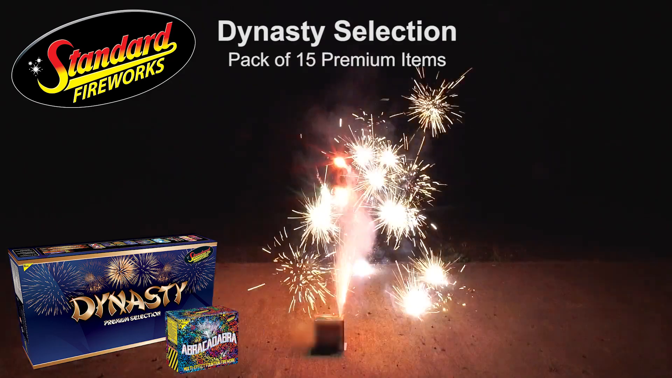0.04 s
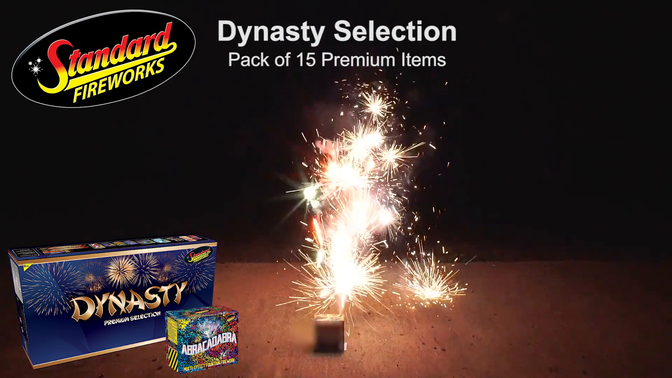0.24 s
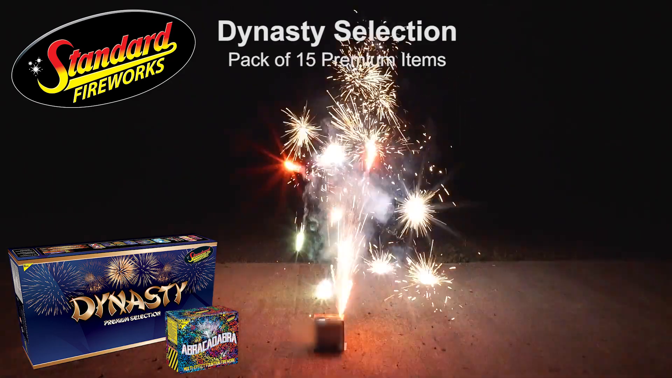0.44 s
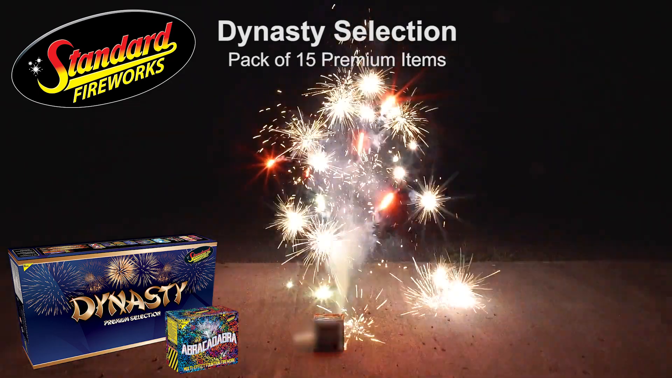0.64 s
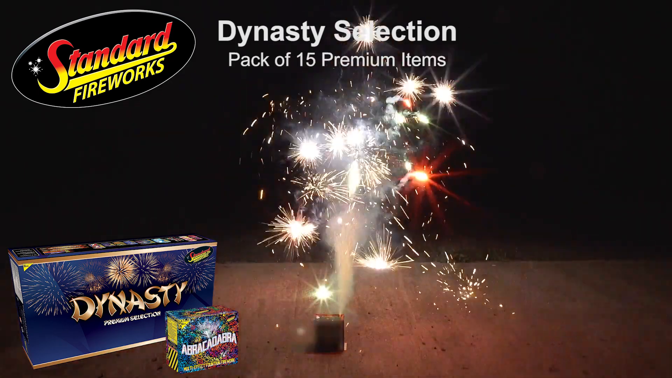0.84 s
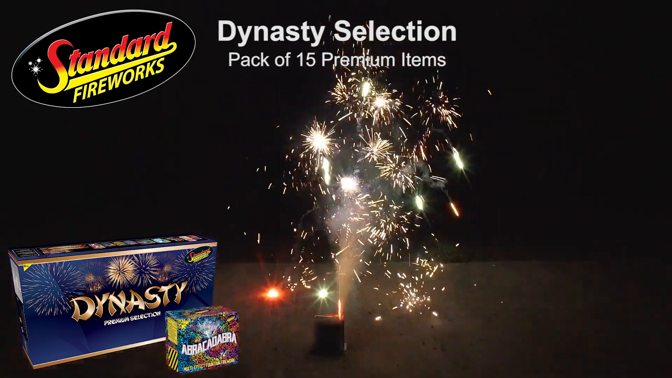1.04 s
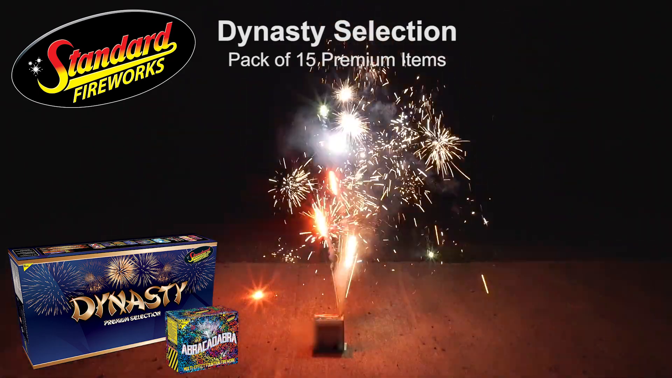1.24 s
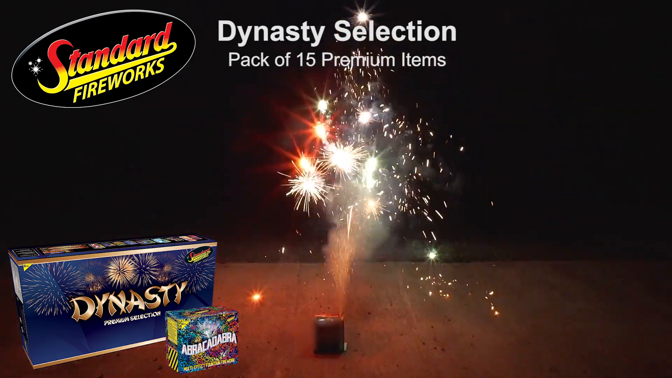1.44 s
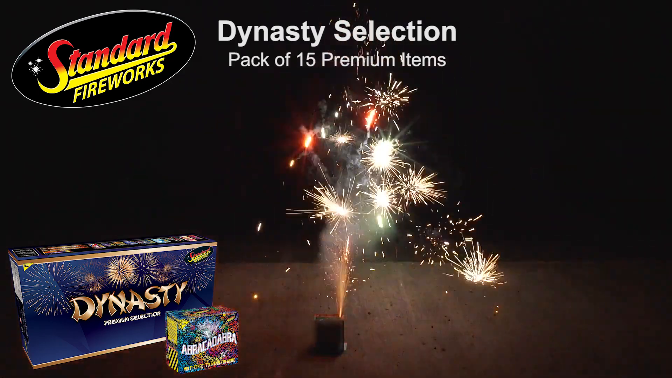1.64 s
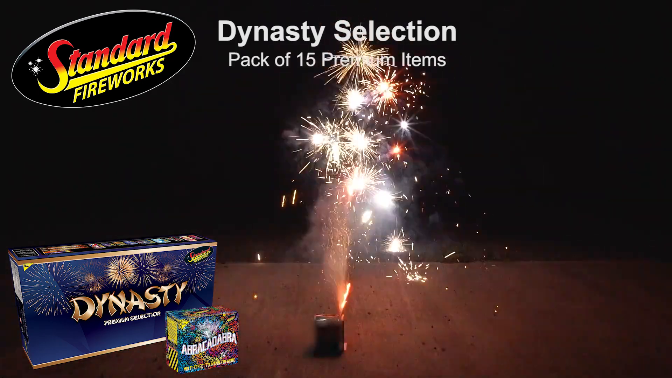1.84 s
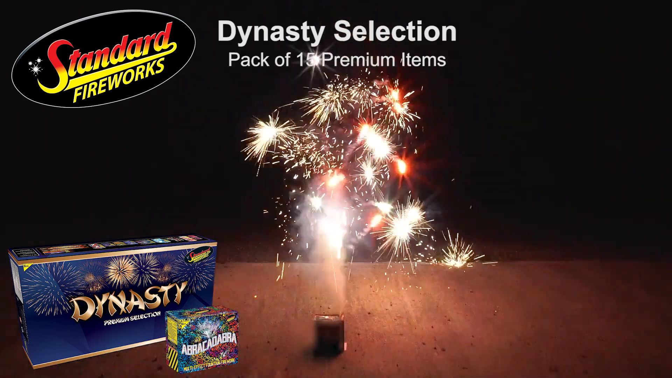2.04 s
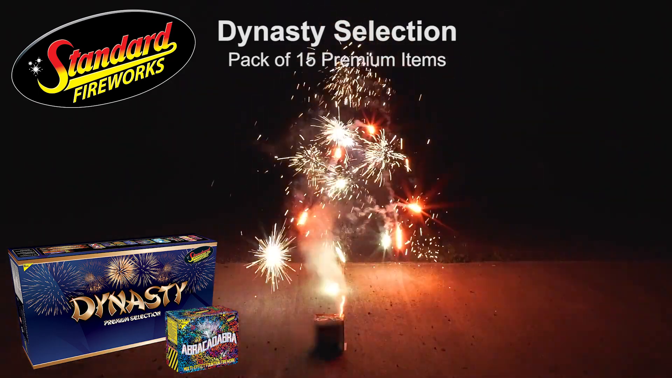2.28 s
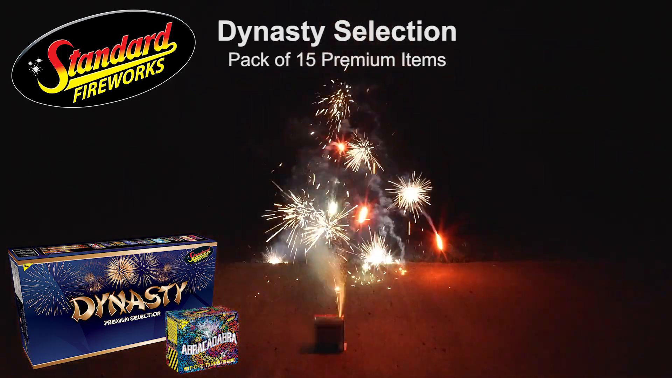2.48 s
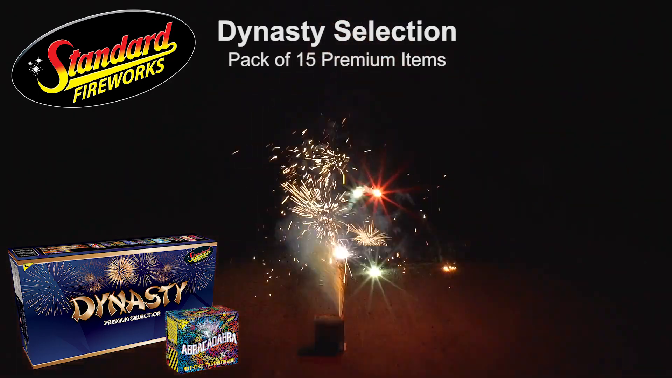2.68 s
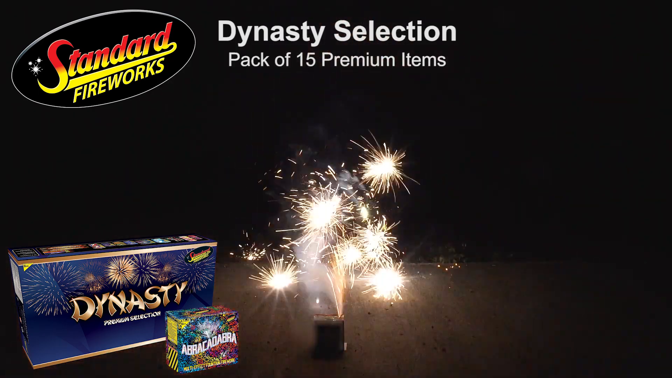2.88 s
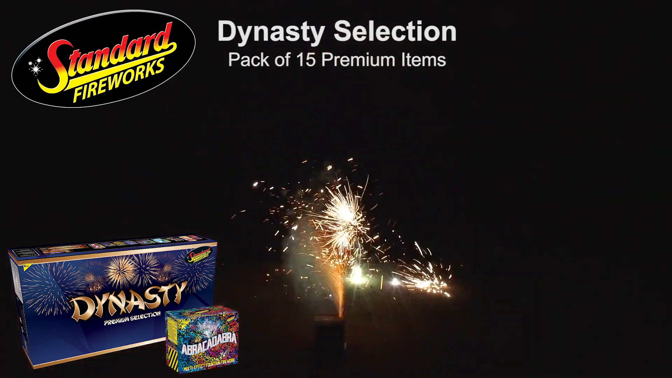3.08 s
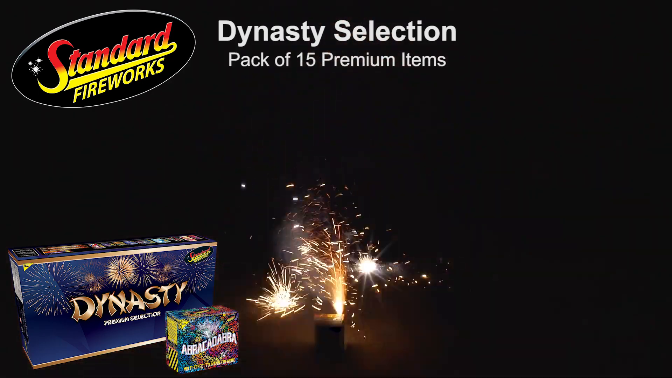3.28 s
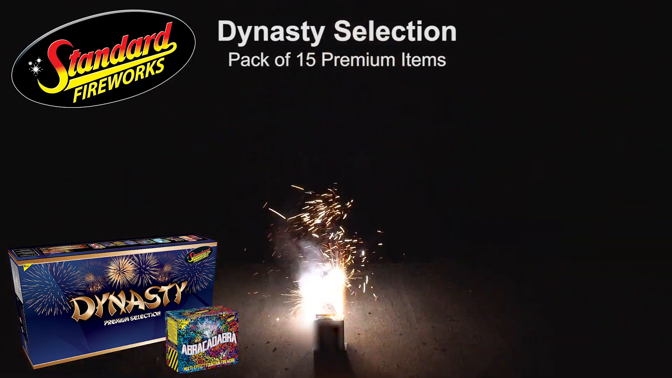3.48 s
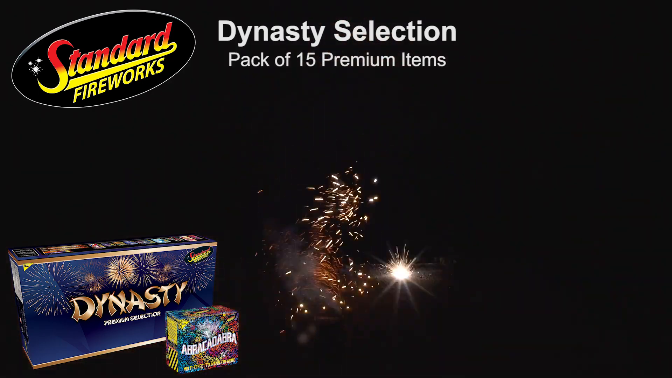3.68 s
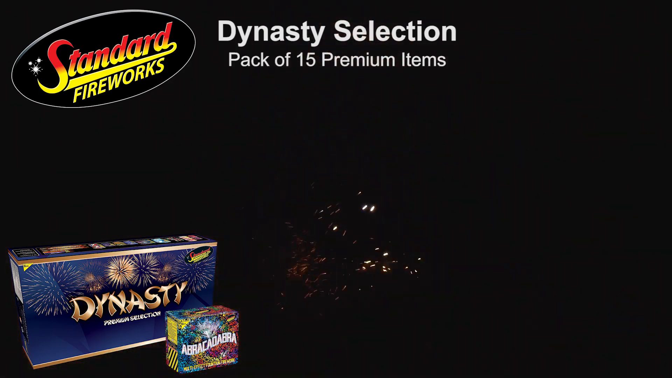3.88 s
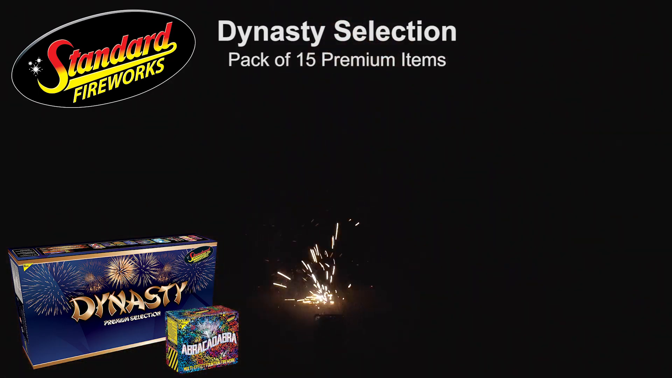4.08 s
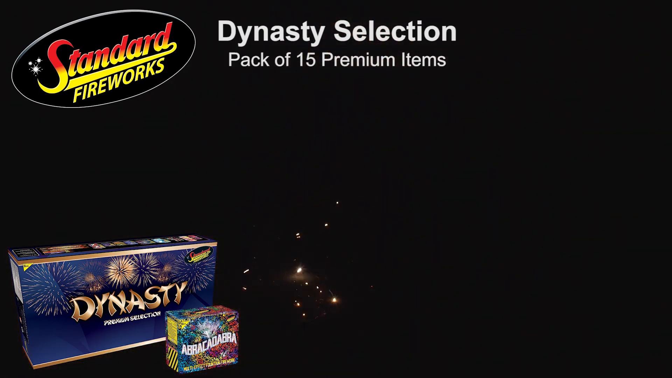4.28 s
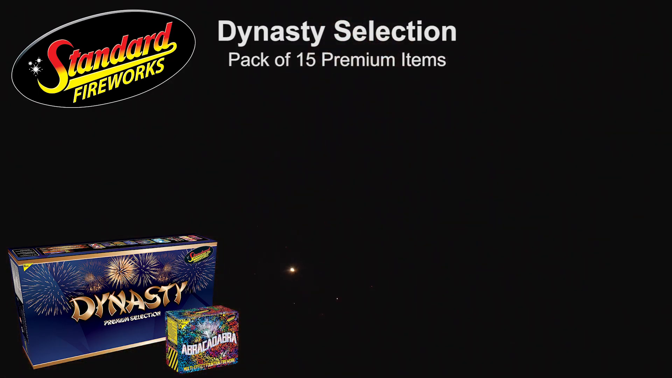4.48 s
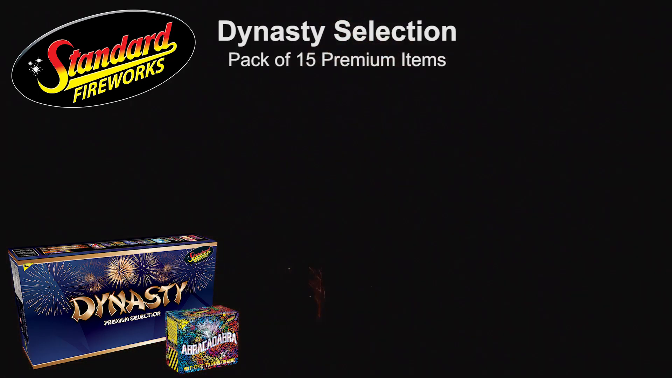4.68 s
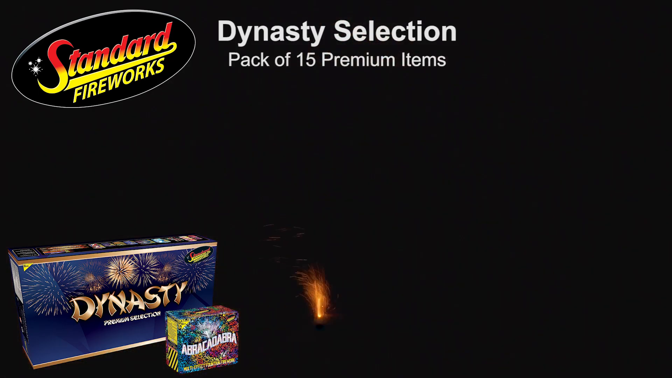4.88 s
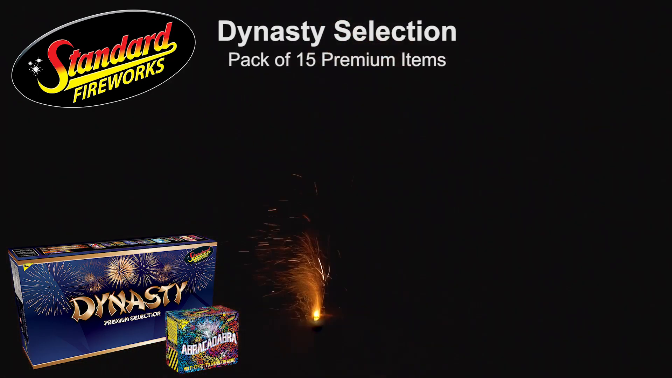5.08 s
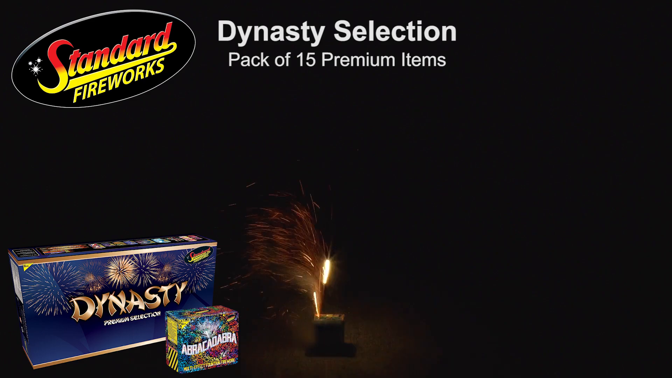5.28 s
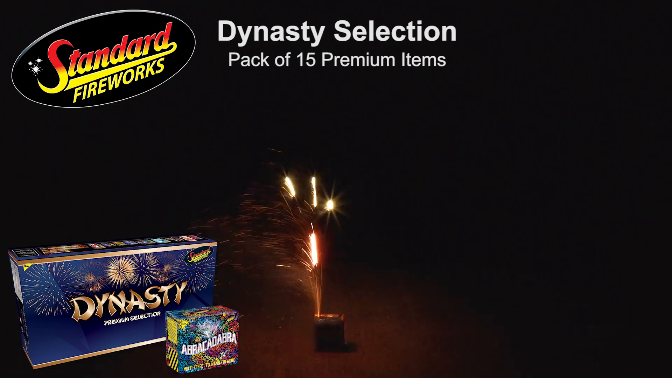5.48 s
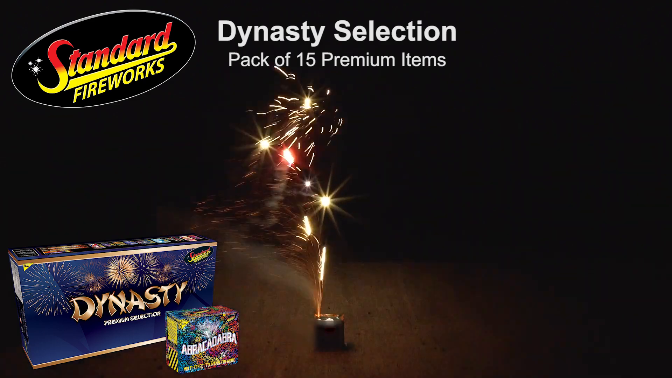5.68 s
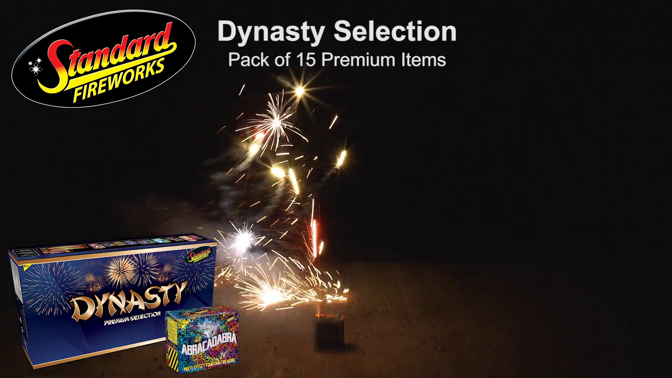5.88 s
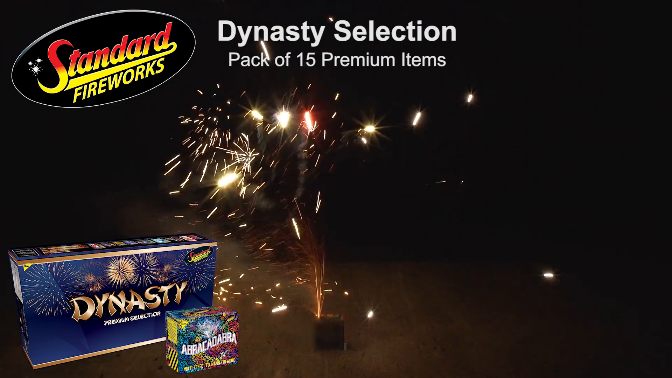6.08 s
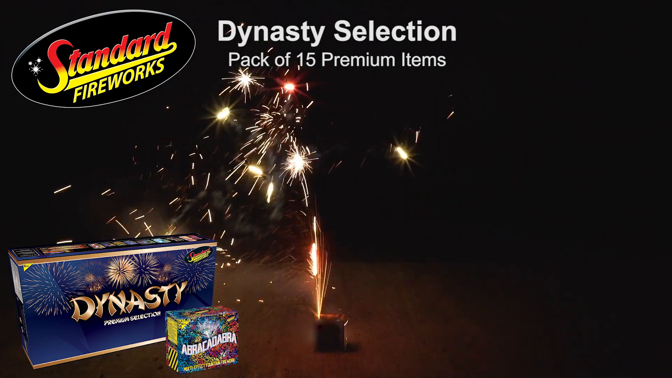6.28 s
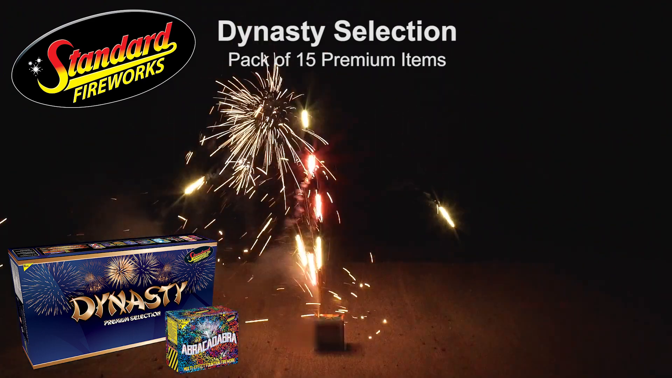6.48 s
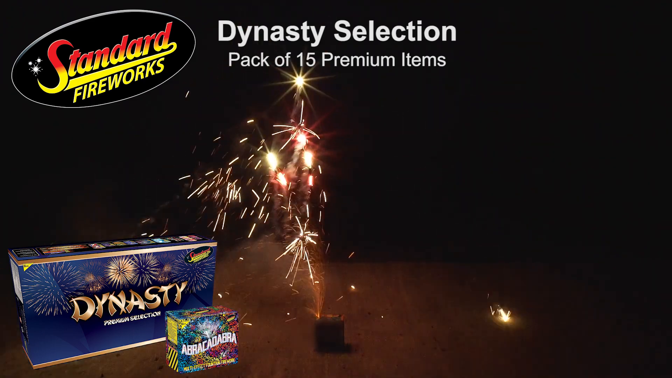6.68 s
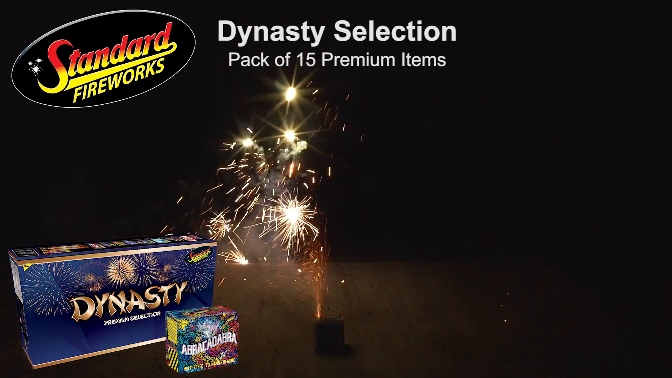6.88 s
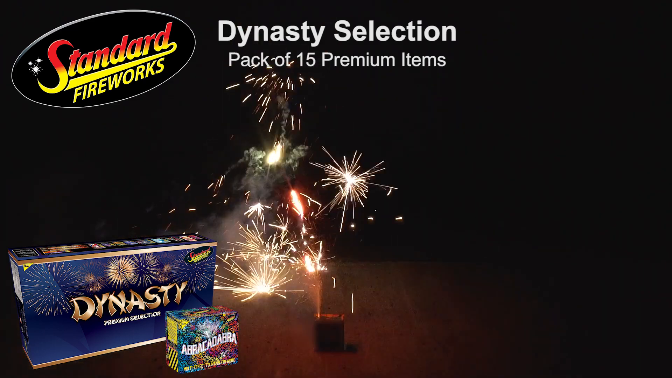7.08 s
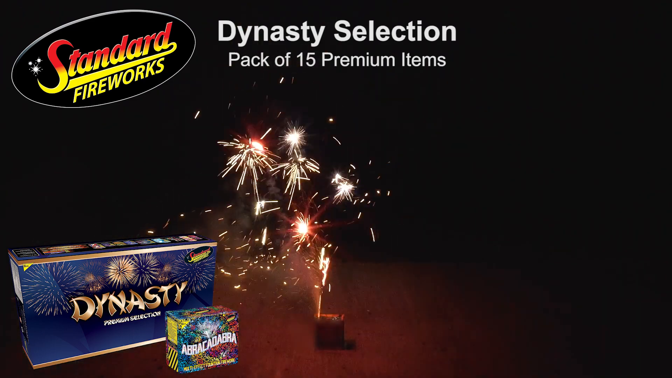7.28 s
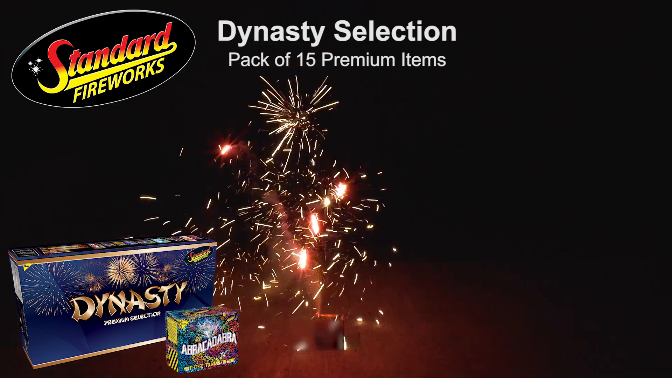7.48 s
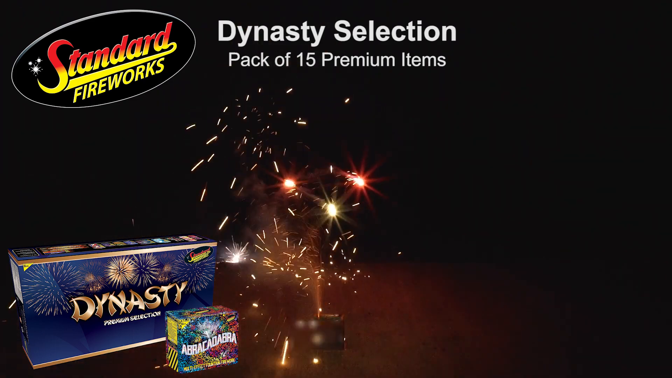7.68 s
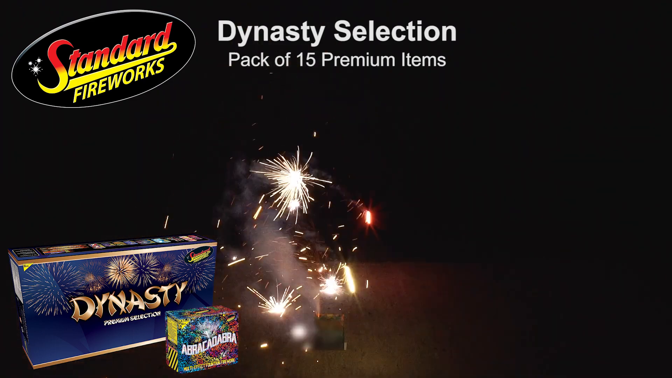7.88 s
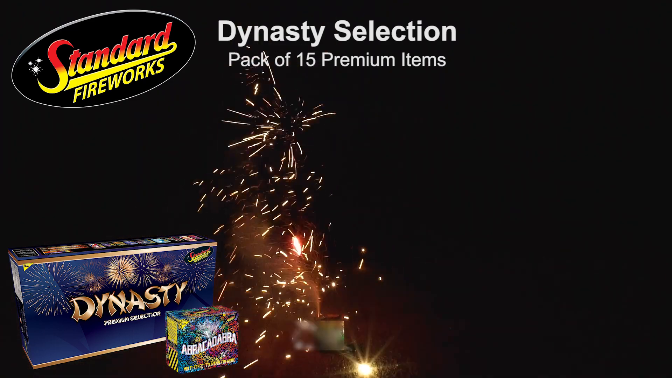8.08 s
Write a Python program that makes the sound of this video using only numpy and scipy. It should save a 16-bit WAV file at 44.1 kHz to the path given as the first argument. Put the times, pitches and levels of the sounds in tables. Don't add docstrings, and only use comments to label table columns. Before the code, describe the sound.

A fountain firework burns on hard ground a few metres from a stereo microphone in a quiet yard at night. From 0 to 2.3 seconds crackling is almost continuous: swarms of tiny sharp blasts, each lasting some hundredths of a second, mixed with harder snaps, over broad hiss and low fluttering rumble. A strong pop lands near 1.8. From 2.4 the bursts thin and the hiss weakens; a short dull gas puff comes at 3.4, then scattered crackles and a hollow sputter at 4.0. Near silence follows until two swelling puffs at 4.6 and 4.85. Hiss grows from 5.0, and crackle returns around 5.6 with fine fizz. A huge sharp bang hits at 5.9, another hard crack at 6.45, then a tight flurry of loud pops at 7.3 to 7.45. Sparse pops and crackles continue to the end at about 8.1, with short dry reflections and faint wall echoes.

```python
import sys
import numpy as np
from scipy import signal
from scipy.fft import rfft, irfft
from scipy.io import wavfile
from scipy.ndimage import uniform_filter1d

SR = 44100
rng = np.random.default_rng(int(sys.argv[2]) if len(sys.argv) > 2 else 0)


def linear_from_db(decibels):
    return 10 ** (np.asarray(decibels, float) / 20)


def transcribe(signal):
    frames = np.atleast_2d(signal).T
    limited = np.clip(frames, -1, 1)
    pcm = np.round(limited * 32767).astype(np.int16)
    wavfile.write(sys.argv[1], SR, pcm)


N = 358974

PORT_LAG_S = 4.3e-5
# t/s, peak level/dB, delay of the answering crack/ms, crack level/dB
FIRST_POPS = [(.0278, -20, 1, -9), (.0979, -18, 1, -9), (.1682, -12, 1.9, -9), (.2015, -18, 1, -9),
              (.218, -16, 1, -9), (.398, -20, 2.3, 1), (.4016, -18, 1, -9), (.4648, -21, 1.9, 3),
              (.5979, -19, 3.6, 0), (.8443, -19, 1, -9), (.9393, -16, 2.4, -6), (1.1045, -19, 1, -9),
              (1.3253, -17, 1, -9), (1.815, -6.5, 2.13, -3.5), (2.0042, -17, .23, -12), (2.435, -17, .8, 0),
              (2.9631, -15.5, .75, -3), (3.0027, -20, 1, -6), (3.0582, -17.5, .8, -4),
              (3.523, -22.5, 1.5, -4), (3.1908, -13, .49, -9)]
SECOND_POPS = [(5.7273, -20, 1.6, 2), (5.7299, -16, .2, -4), (5.8212, -22, 2.3, -1), (5.839, -17, .9, -20),
               (6.097, -20, .6, 0), (6.2145, -18, 1.5, -9), (6.4466, -4.5, 1.69, -4),
               (6.7257, -14, 1.6, -6), (6.7971, -11, .9, -1), (6.8678, -23, 3.5, 2), (7.019, -18, .7, -4),
               (7.0495, -23, 1.8, -5), (7.06, -20, 1, -8), (7.063, -12, 1, -7), (7.0752, -20, 1.2, 1),
               (7.0809, -18, 2.9, 2), (7.1935, -25, .84, -2), (7.2957, -12, 1.4, -4), (7.2981, -15, .8, 0),
               (7.3453, -6, .21, 1), (7.3978, -23, .8, 0), (7.4099, -6, .65, -4), (7.4114, -4, .67, -3),
               (7.4497, -18, 1.6, -4), (7.5543, -15, 2.9, -6), (7.6963, -20, 1.1, -3), (7.9011, -16, .6, 1),
               (7.906, -21, 1, -4), (8.0425, -10, 1.5, -9)]
# t/s, peak level/dB, echo delay/ms, echo level/dB, positive phase/us
BANG = [
    (5.9254, -1, .21, -.5, 85),
    (5.92545, -5, .14, -2, 200),
    (5.9255, -19, .2, 0, 650),
]


def evened(x):
    return x / np.sqrt(np.mean(x ** 2) + 1e-20)


def read(points, hz):
    f, value = np.transpose(points)
    return np.interp(np.log(hz + 1), np.log(f + 1), value)


def add(mix, s, sound):
    part = mix[:, round(s * SR):][:, :sound.shape[1]]
    part += sound[:, :part.shape[1]]


def coloured(points, channels):
    hz = np.fft.rfftfreq(N, 1 / SR)
    white = rng.standard_normal((channels, N))
    return evened(irfft(rfft(white) * linear_from_db(read(points, hz)), N))


def air():
    # t/s, level/dB
    buffet_course = [(0, -59), (.7, -55.5), (2.2, -60), (2.8, -67.5), (2.92, -56), (3.05, -65.5),
                     (3.4, -66), (4.3, -72), (7.1, -69.5), (7.2, -53), (7.3, -61), (7.52, -65), (7.62, -61),
                     (7.72, -67), (7.85, -59.5), (8.14, -75)]
    # f/Hz, level/dB
    rumble = [(15, 1.5), (30, -10.5), (60, -7.5), (120, -11), (200, -26.5), (800, -78.5)]
    # f/Hz, level/dB
    night = [(200, -2.5), (520, -19), (1300, -12.5), (2500, -16.5), (4300, -12), (5900, -27), (11000, -26),
             (12500, -43)]
    night_db = -81
    s, db = np.transpose(buffet_course)
    lumps_db = 2.0 * evened(uniform_filter1d(rng.standard_normal((2, N)), 4000))
    buffet_db = np.interp(np.arange(N) / SR, s, db) + 2.5 + lumps_db
    buffet = linear_from_db(buffet_db) * coloured(rumble, channels=2)
    return buffet + linear_from_db(night_db + 1.0) * coloured(night, channels=2)


def puff(t, start, length, db, swell_db, roar_db):
    hold_s, edge_s = 0.026, 0.017
    roar_lag_db = -21
    left = np.clip(1 - (t - start) / (length - hold_s), 0, 1)
    edge = np.minimum(t - start, start + length - t) / edge_s
    hiss = np.clip(edge, 0, 1) * linear_from_db(db - swell_db * left)
    return hiss, hiss * linear_from_db(roar_db + roar_lag_db * left * swell_db / 14)


def nozzle():
    # t/s, hiss level/dB, low roar level relative to the hiss/dB
    flame = [(0, -50.5, 3), (1.4, -53.5, 0), (2.3, -59, 1.5), (3.36, -60, 2), (3.5, -72.5, 3),
             (3.801, -73.5, 0.5), (4.501, -89.5, 5.5), (4.6, -80, -1), (4.77, -67, -7.5),
             (4.97, -56.5, -1.5), (5.02, -64.5, 5.5), (5.13, -61.5, -4), (5.35, -55.5, -6),
             (5.58, -53, -4.5), (5.8, -54.5, -1), (7.3, -66.5, 3.5), (8.14, -54, -6)]
    # t/s, length/s, final hiss level/dB, swell/dB, final roar level relative/dB
    puffs = [
        (4.602, 0.16, -47.5, 16, -10),
        (4.833, 0.13, -55, 16, -5),
    ]
    flare_up = (3.38, .11, -51, 1, 0)
    # f/Hz, level/dB
    hiss_colour = [(2000, -19.5), (2900, 0), (3800, 2.5), (5300, 0), (7500, 0), (10400, -5.5),
                   (11400, -15.5), (13500, -10)]
    roar_colour = [(140, -17.5), (330, -23.5), (500, -15.5), (900, -9), (1500, -3.5), (2000, -3.5),
                   (2500, -17), (4000, -53)]
    flare_colour = [(300, -10.5), (900, 0), (1700, -0.5), (2300, -25), (3600, 2), (4800, -13), (5700, -17),
                    (14000, -37)]
    s, hiss_db, roar_db = np.transpose(flame)
    t = np.arange(N) / SR
    flutter = linear_from_db(1.1 * evened(uniform_filter1d(rng.standard_normal(N), 400)))
    hiss, roar = sum(np.array(puff(t, *row)) for row in puffs)
    hiss = hiss + linear_from_db(np.interp(t, s, hiss_db))
    roar = roar + linear_from_db(np.interp(t, s, hiss_db + roar_db))
    jet = hiss * coloured(hiss_colour, channels=3)
    jet = flutter * (jet + roar * linear_from_db(1.0) * coloured(roar_colour, channels=3))

    jw = 2j * np.pi * np.fft.rfftfreq(N, 1 / SR)
    ground = linear_from_db(-3.75) * np.exp(-jw * 0.00018) / (1 + jw * 2.5e-5)
    mirror = (1 + ground) * linear_from_db(-4.0)
    lag = np.exp(-jw * np.array([[PORT_LAG_S], [0]]))
    direct = irfft(rfft(jet[0]) * mirror * lag, N)
    direct += flutter * puff(t, *flare_up)[0] * coloured(flare_colour, channels=1)
    scattered = irfft(rfft(jet[1:]) * mirror, N)
    return direct + linear_from_db(-4.5) * scattered


def blast(micros, echo_ms, echo_db, aside, damping=2.42):
    jw = 2j * np.pi * np.fft.rfftfreq(512, 1 / SR)
    lasting = jw * micros * 1e-6
    shock = lasting / (1 + damping * lasting + lasting ** 2)
    ringing = jw / (2 * np.pi * 8000)
    capsule = 1 / (1 + ringing / 3.14 + ringing ** 2)
    mirror = 1 + linear_from_db(echo_db) * np.exp(-jw * echo_ms / 1000) / (1 + jw * 8e-6)
    delay_s = 8 / SR + np.array([[PORT_LAG_S * (1 + aside)], [0]])
    fade = np.cos(jw.imag / SR / 2)
    return irfft(shock * capsule * mirror * np.exp(-jw * delay_s) * fade, 512)


def swarm(ms, dice, per_s=3800, spread_db=4.0, ramp_ms=1.8, sink_db=3.5, attack=.35):
    size = round((ms + ramp_ms) / 1000 * SR)
    fires, sizes = dice[:size].T
    t_ms = np.arange(size) * 1000 / SR
    edges = np.minimum(t_ms / (attack * ramp_ms), (ms + ramp_ms - t_ms) / (1.4 * ramp_ms))
    shape = np.clip(edges, 0, 1) * linear_from_db(-sink_db * np.arange(size) / size)
    strength = linear_from_db(-spread_db * np.log(np.maximum(sizes, .025)))
    clicks = (fires < per_s / SR) * strength * shape
    return clicks / np.sqrt(np.sum(clicks ** 2) / (ms / 1000 * SR) + 1e-20)


def sputter():
    # f/Hz, width/Hz, level/dB
    tube = [(742, 27, 2.5), (850, 140, -9), (1300, 500, -6), (3400, 1100, 1)]
    # t/s, length/ms, level/dB
    embers = [
        (3.968, 31, -46.5),
        (4.0, 30.5, -48.5),
        (4.196, 41, -69),
        (4.243, 45, -79),
    ]
    out, t = np.zeros((2, N)), np.arange(2000) / SR
    ring = 0
    for hz, width, db in tube:
        decay = np.sqrt(width) * np.exp(-np.pi * width * t)
        ring = ring + linear_from_db(db) * decay * np.sin(2 * np.pi * hz * t)
    mouth = signal.butter(3, [670, 5000], "bandpass", fs=SR, output="sos")
    ring = signal.sosfilt(mouth, ring)
    ring = ring / np.linalg.norm(ring)
    for s, ms, db in embers:
        dice = rng.random((5000, 2))
        clicks = swarm(ms, dice, per_s=2600, spread_db=6.0, ramp_ms=9.7, sink_db=4.5, attack=0.81)
        add(out, s, linear_from_db(db) * np.convolve(clicks, ring)[None] * np.ones((2, 1)))
    return out


def shower():
    # t/s, level/dB
    fizz = [(0, -51.5), (2.3, -62), (3.3, -75), (3.751, -72), (4.399, -94.5), (5.399, -103), (5.7, -61),
            (6.1, -56.5), (6.75, -57.5), (7.3, -55), (8.14, -69.5)]
    s, db = np.transpose(fizz)
    clumps_db = 2.9 * evened(uniform_filter1d(rng.standard_normal(N), 700))
    out = np.zeros((2, N))
    for height, side in rng.random((4, 2)):
        fires = rng.random(N) < 1800 / SR
        clicks = fires * linear_from_db(7.2 * np.minimum(rng.exponential(1, N), 4))
        shape = blast(66, 0.23 + 1.66 * height, -1.5, 1.1 * (side - .5))
        out += signal.oaconvolve(clicks[None], shape, axes=1)[:, :N]
    return linear_from_db(np.interp(np.arange(N) / SR, s, db) + clumps_db) * evened(out)


def debris():
    out, t = np.zeros((2, N)), np.arange(400) / SR
    clicks = rng.standard_normal(400) * (rng.random(400) < .3) * linear_from_db(-60 * t / 0.0068)
    shape = blast(150, .21, -4, 0)
    shape = shape / np.linalg.norm(shape[1])
    add(out, BANG[0][0] + .0004, linear_from_db(-13) * signal.fftconvolve(clicks[None], shape, axes=1))
    return out


def stars():
    # t/s, length/ms, level/dB
    dense_stars = [(0.001, 12, -41.5), (0.015, 22.4, -35.5), (0.0599, 35, -37.5), (0.0978, 4.5, -33.5),
                   (0.1038, 12.7, -38), (0.1277, 11, -40.5), (0.1407, 21, -41.5), (0.1626, 10.4, -36.5),
                   (0.1776, 7.7, -52), (0.1966, 4.8, -33.5), (0.2065, 25.4, -34.5), (0.2434, 31, -37.5),
                   (0.2864, 13, -49.5), (0.3003, 9.1, -38.5), (0.3143, 6.6, -37), (0.3362, 12.3, -36.5),
                   (0.3562, 9.6, -38.5), (0.3672, 7.9, -34), (0.3951, 7.5, -32.5), (0.4121, 12, -37),
                   (0.432, 27, -39), (0.463, 14.5, -34.5), (0.4759, 9.9, -36), (0.5088, 19, -37),
                   (0.5388, 12.5, -40), (0.5657, 4.7, -41), (0.5717, 9.7, -43), (0.5907, 25, -35.5),
                   (0.6226, 28, -36), (0.6465, 34, -37), (0.6815, 14, -40.5), (0.6974, 7.2, -44.5),
                   (0.7114, 8, -38), (0.7254, 5.7, -44.5), (0.7353, 8.8, -41), (0.7473, 12.5, -39.0),
                   (0.7852, 14, -41.5), (0.8092, 4.2, -41.5), (0.8221, 9.4, -33), (0.8321, 13.6, -35.5),
                   (0.8481, 9.8, -37), (0.862, 15, -41), (0.901, 18.2, -38), (0.9279, 24, -35.5),
                   (0.9678, 13.5, -34.5), (0.9947, 4.2, -35.5), (1.0147, 7.2, -43.5), (1.0297, 5.4, -38.5),
                   (1.0526, 13, -38), (1.0746, 22, -36.5),
                   (1.101, 13.3, -39), (1.1149, 10.5, -40), (1.1258, 11, -43), (1.14, 8.7, -39.0),
                 (1.1551, 28.4, -39.5), (1.189, 11.2, -38.0), (1.2043, 8.3, -40.5), (1.223, 7.5, -43.5),
                 (1.246, 12, -37), (1.2624, 6.9, -38), (1.271, 3.2, -38), (1.2772, 18, -38),
                 (1.2968, 43, -38.5), (1.396, 32, -73), (1.4268, 17, -39), (1.4502, 8.9, -35.5),
                 (1.4773, 17.8, -38.0), (1.5173, 10, -39), (1.5653, 11, -40.5), (1.5828, 12, -41),
                 (1.6027, 16.5, -38), (1.629, 7.2, -40), (1.6513, 7.4, -40), (1.6724, 16.5, -44),
                 (1.713, 19, -37), (1.7297, 23, -37.5), (1.759, 6.6, -44.5), (1.773, 5, -41.5),
                 (1.784, 13, -55), (1.797, 7.6, -37.5), (1.8153, 4.1, -32), (1.8247, 14, -40),
                 (1.8392, 35.4, -37.5), (1.9006, 24.6, -39), (1.9325, 2.7, -32), (1.9425, 6.4, -41),
                 (1.953, 9.6, -39), (1.9722, 14, -37.5), (1.9895, 12, -36.5), (2.0018, 7.3, -42),
                 (2.0114, 14.3, -39), (2.0298, 13, -37.5), (2.047, 20, -35.5), (2.073, 8.3, -36.5),
                 (2.084, 13, -39.5), (2.1052, 13.5, -35), (2.1233, 5.7, -35), (2.1288, 15, -37.5),
                 (2.1521, 14, -35.0), (2.175, 16, -47), (2.193, 5.4, -42), (2.21, 11.6, -44),
                 (2.2264, 20, -37), (2.2474, 11, -43), (2.2647, 10.4, -41), (2.2952, 13, -44),
                 (2.3132, 1.6, -34)]
    # t/s, length/ms, level/dB
    last_stars = [(2.41, 9.1, -35), (2.433, 25, -42), (2.465, 20.5, -42.5), (2.4912, 9.6, -48),
                  (2.507, 10, -36.5), (2.533, 13, -41.5), (2.584, 6.2, -42), (2.6174, 9.9, -42),
                  (2.635, 12.7, -41.5), (2.665, 10, -43.5), (2.6833, 7, -40.5), (2.7124, 13, -37.5),
                  (2.7345, 15, -42.5), (2.777, 31.5, -39), (2.814, 16.6, -44.5), (2.85, 8.8, -36),
                  (2.861, 22.5, -35.5), (2.888, 10, -34.5), (2.901, 19.7, -37.5), (2.927, 15.7, -39),
                  (2.9523, 8.4, -36), (3.001, 27, -44.5), (3.052, 10.7, -40.5), (3.108, 11, -43),
                  (3.1356, 4.1, -35), (3.154, 8.7, -42.5), (3.17, 11, -41.5), (3.194, 11, -42.5),
                  (3.207, 13, -42), (3.2382, 21, -41.5), (3.277, 7.5, -52), (3.293, 9, -42.5),
                  (3.371, 37.4, -40.5), (3.4835, 13.7, -38.5), (3.5224, 11.7, -40), (3.548, 14.6, -41),
                  (3.575, 10.4, -46), (3.693, 25, -39), (3.998, 21, -43.5)]
    # t/s,
    # length/ms, level/dB
    second_stars = [(5.609, 9.9, -39), (5.7015, 5.9, -44.5), (5.815, 13.5, -40.5), (5.8403, 11.5, -36.5),
                    (5.862, 9.3, -32.5), (5.886, 5.5, -38), (5.942, 9, -45), (5.9555, 4.9, -53),
                    (5.98, 7.9, -39), (5.999, 4.8, -40.5), (6.0862, 2.5, -45), (6.0956, 3, -32.5),
                    (6.1206, 6.4, -38.5), (6.146, 3.6, -37.5), (6.195, 11, -53), (6.215, 17, -32.5),
                    (6.278, 16.5, -41), (6.2967, 9.8, -47), (6.8536, 7.3, -56), (6.8682, 11, -37.5),
                    (7.05, 5.3, -33), (7.2941, 11.4, -34), (7.3973, 4.9, -35), (6.358, 34, -53.5),
                    (6.384, 26, -50), (6.5333, 7.9, -41), (6.6066, 14, -54.5), (6.653, 16, -45.5),
                    (6.9968, 9.4, -39.5), (7.076, 12, -36.5), (7.061, 7.2, -32.5), (7.8005, 11, -49.5),
                    (7.2385, 9.4, -37), (7.5223, 2.2, -43), (7.511, 2.7, -59), (7.5395, 3.3, -51),
                    (7.686, 4.5, -45), (7.5626, 14, -43), (7.627, 6.6, -39), (7.717, 12, -38.5),
                    (7.8558, 12, -41), (7.902, 4.5, -32), (7.915, 11, -38.5), (7.927, 20, -41),
                    (7.9439, 5.4, -42.5), (7.9789, 16, -53), (7.5547, 6.7, -38.5), (7.4498, 3.9, -36)]
    relight_s, second_grain = 4.6, .8
    lump_db, side_spread, side_db = 3, 0.81, 5.5
    splinters = [(s, 5.0, db - 29) for s, db, _, _ in FIRST_POPS + SECOND_POPS]
    rows = dense_stars + last_stars + second_stars + splinters
    out = np.zeros((2, N))
    dice, place = rng.random((len(rows), 4000, 2)), rng.random((len(rows), 3, 4))
    for (s, ms, db), star_dice, parts in zip(rows, dice, place):
        at = max(s - .0008, 0)
        fineness = second_grain if s > relight_s else 1
        thirds = np.array_split(swarm(ms, star_dice), len(parts))
        for clicks, (height, grain, side, lump) in zip(thirds, parts):
            micros = (60 + 80 * grain) * fineness
            shape = blast(micros, .2 + 2.1 * height, -3, side_spread * (side - .5))[:, :192]
            shape = shape * linear_from_db(side_db * (side - .5) * np.array([[-1], [0]]))
            gain = linear_from_db(db + lump_db * (lump - 1.0)) / np.linalg.norm(shape[1])
            add(out, at, gain * np.array([np.convolve(clicks, port) for port in shape]))
            at += len(clicks) / SR
    return out


def pops():
    # t/s, peak level/dB
    snaps = [(0.0594, -23.5), (0.2992, -20), (0.3144, -21), (0.3356, -28), (0.3581, -24), (0.5112, -25.5),
             (0.5666, -25), (0.7846, -23), (0.822, -26), (0.9, -30), (0.9692, -19), (0.9941, -26),
             (1.015, -28), (1.054, -17), (1.0741, -18.5), (1.2516, -21), (1.4293, -21.5), (1.483, -25),
             (1.5194, -21), (1.5658, -30.5), (1.6506, -27), (1.7115, -24), (1.901, -25), (1.9769, -19.5),
             (2.0303, -24.5), (2.055, -19.5), (2.1063, -20), (2.154, -22), (2.2119, -27), (2.297, -25),
             (2.4104, -21), (2.7106, -45), (2.7783, -33), (3.107, -30), (3.1348, -19), (3.2984, -26),
             (3.9799, -36), (4.0036, -32)]
    first_micros, second_micros = 177, 62
    rows = [row + (first_micros,) for row in FIRST_POPS]
    rows += [row + (second_micros,) for row in SECOND_POPS]
    # 1 ms late, echo after 1.4 ms at -4 dB
    rows += [(s + .001, db - 2.5, 1.4, -4, first_micros) for s, db in snaps]
    out, sides = np.zeros((2, N)), rng.random((len(rows), 1))
    for (s, db, echo_ms, echo_db, micros), (side,) in zip(rows, sides):
        lasting = 0.51 * micros * linear_from_db((db + 14.5) / 6)
        shape = blast(lasting, echo_ms, echo_db, .12 * (side - .5), damping=5.0)
        add(out, s - 12 / SR, linear_from_db(db - 1.56) * shape / shape[1, :15].max())
    for s, db, echo_ms, echo_db, micros in BANG:
        shape = blast(.6 * micros, echo_ms, echo_db, 0, damping=.9)
        add(out, s - 12 / SR, linear_from_db(db) * shape / shape[1, :16].max())
    return out


def yard(x, hard):
    # f/Hz, t60/s
    yard_decay = [(300, 0.16), (1500, 0.19), (5000, 0.09), (12000, 0.062)]
    wall_s = .2218
    taps = np.zeros((2, SR // 2))
    at = np.arange(20, SR // 2 - 20, 20) + rng.integers(0, 20, (2, (SR // 2 - 21) // 20))
    np.put_along_axis(taps, at, rng.choice([-1., 1.], at.shape), 1)
    hz, t, z = signal.stft(taps, SR, nperseg=256)
    fade = linear_from_db(-60 * t / read(yard_decay, hz)[:, None]) * np.minimum(t / 0.0046, 1)
    tail = signal.istft(z * fade, SR, nperseg=256)[1]
    wet = signal.fftconvolve(x, tail / np.linalg.norm(tail[0]), axes=1)[:, :N]
    dull = signal.butter(2, [1200, 4200], "bandpass", fs=SR, output="sos")
    wall = np.pad(signal.sosfilt(dull, hard), ((0, 0), (round(wall_s * SR), 0)))[:, :N]
    return linear_from_db(-25.5) * wet + linear_from_db(-26.5) * wall


def ports(x):
    # f/Hz, level/dB
    mic_colour = [(300, 1.5), (400, -0.5), (600, 6.5), (2000, 4.5), (8000, 2), (10300, 10), (11500, 12),
                  (13500, 15), (15800, 12.5)]
    # f/Hz, level/dB
    left_right = [(60, -.5), (250, -5.5), (700, -2.6), (2800, -1.8), (5000, 0), (9000, -3.5), (11300, -.4),
                  (15000, -3.5)]
    hz = abs(np.fft.fftfreq(2048, 1 / SR))
    tilt_db = read(left_right, hz) * np.array([[.5], [-.5]])
    log_gain = np.log(linear_from_db(read(mic_colour, hz) + tilt_db))
    colour = np.fft.ifft(np.exp(np.conj(signal.hilbert(log_gain)))).real[:, :1024]
    return signal.oaconvolve(x, colour, axes=1)[:, :N]


def scene():
    hard = ports(pops() + debris())
    heard = hard + ports(stars() + shower()) + sputter()
    jet = nozzle() * linear_from_db(np.array([[-1.1], [1.1]]))
    return heard + yard(heard, hard) + jet + air()


def band_limit(x):
    return signal.sosfilt(signal.butter(12, 16770, fs=SR, output="sos"), x)


def record(dry):
    edge = signal.firwin(1023, 15880, window=("kaiser", 8), fs=SR)
    limited = signal.oaconvolve(np.clip(dry, -1, 1), edge[None], "same")
    return band_limit(np.clip(limited, -1, 1))


dry = scene()
out = record(dry)
transcribe(out)
```